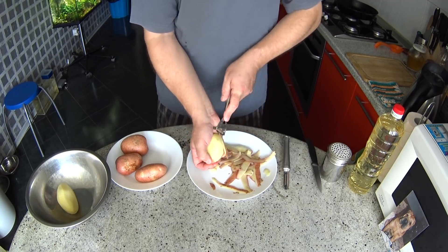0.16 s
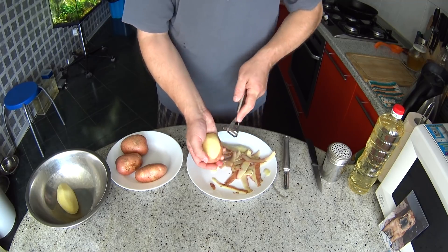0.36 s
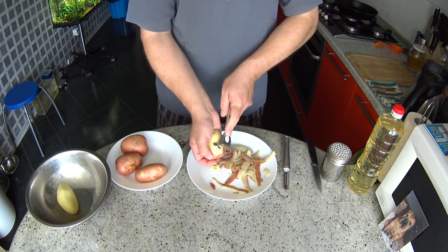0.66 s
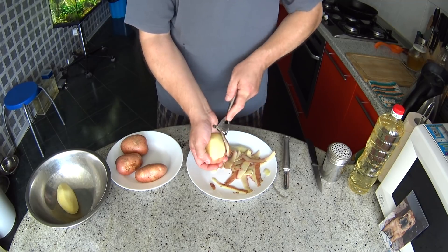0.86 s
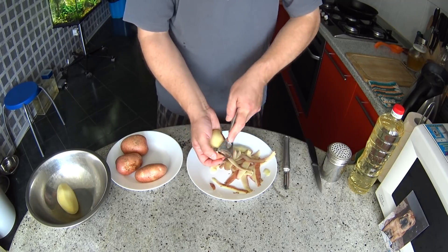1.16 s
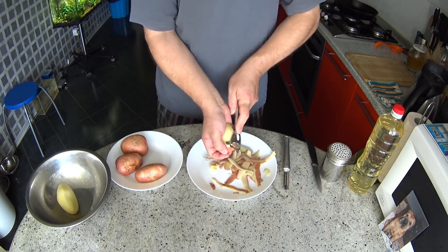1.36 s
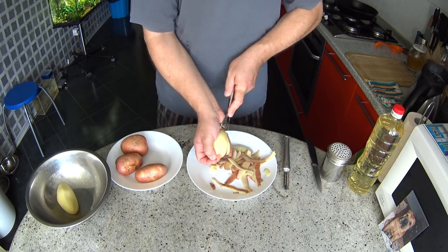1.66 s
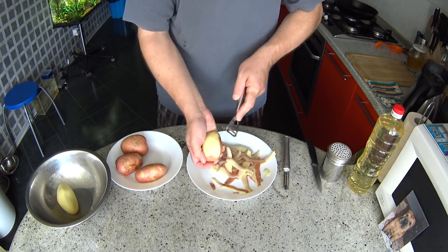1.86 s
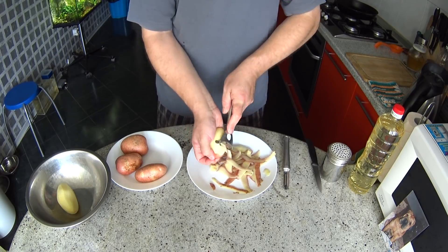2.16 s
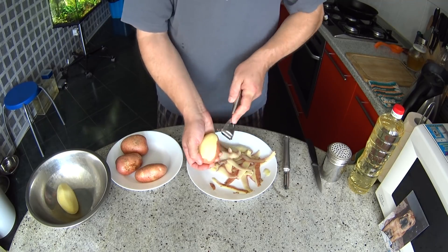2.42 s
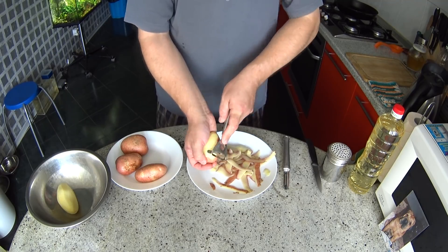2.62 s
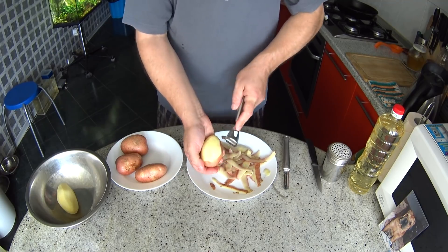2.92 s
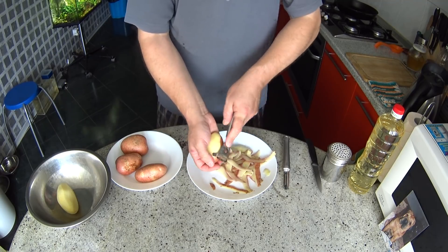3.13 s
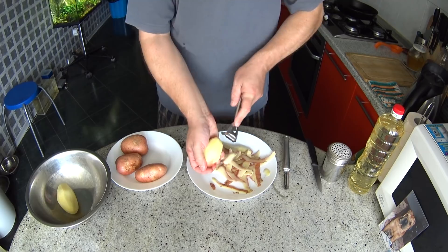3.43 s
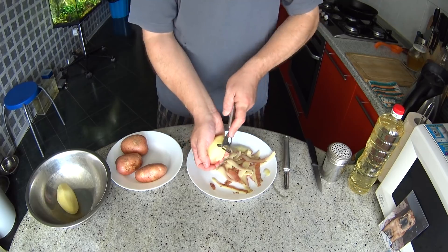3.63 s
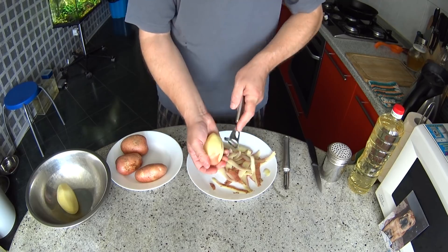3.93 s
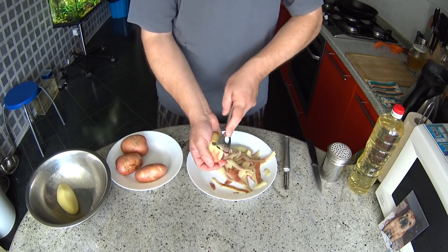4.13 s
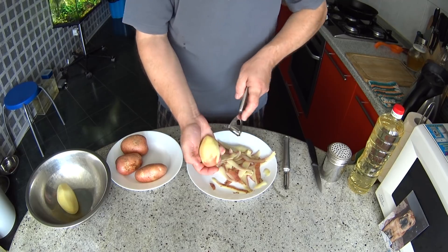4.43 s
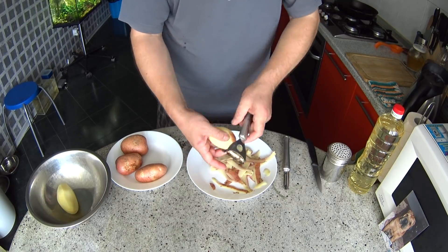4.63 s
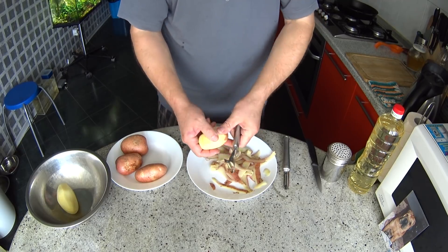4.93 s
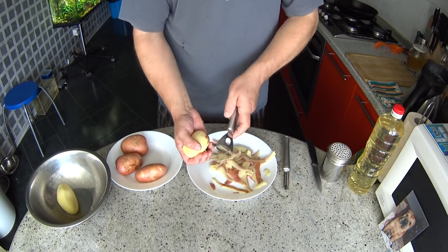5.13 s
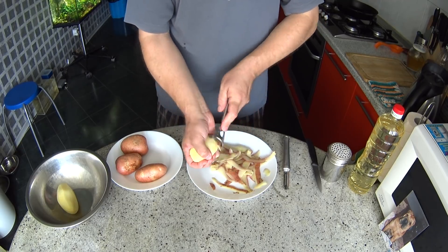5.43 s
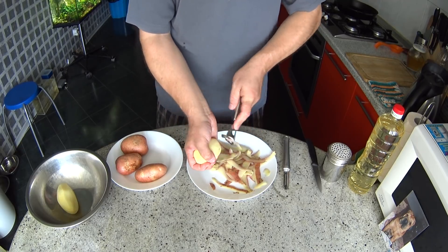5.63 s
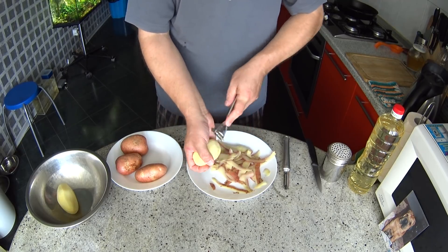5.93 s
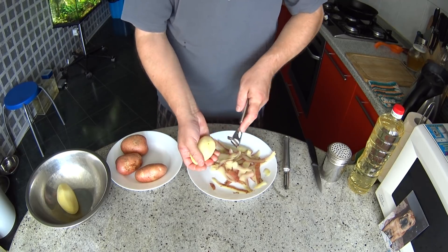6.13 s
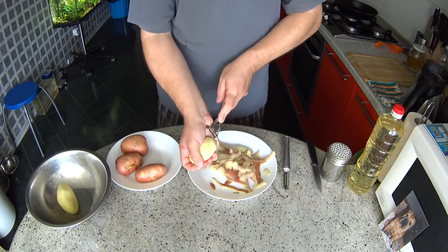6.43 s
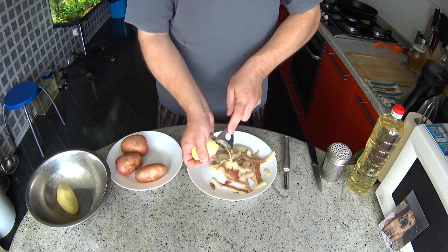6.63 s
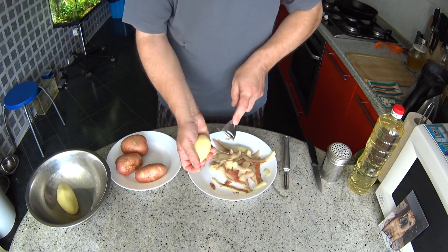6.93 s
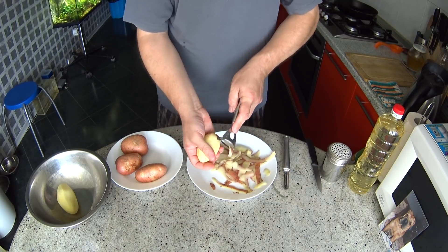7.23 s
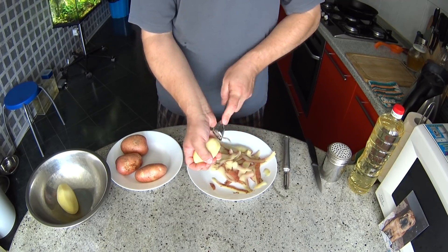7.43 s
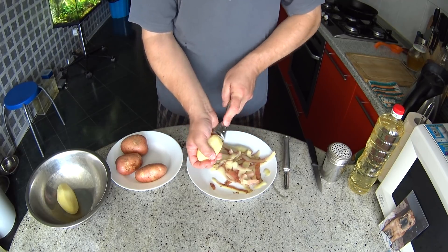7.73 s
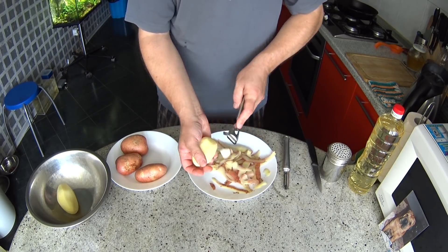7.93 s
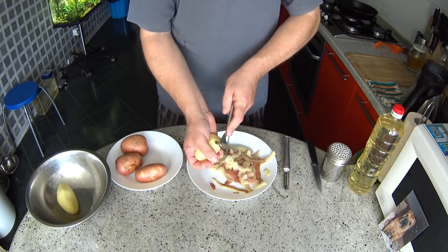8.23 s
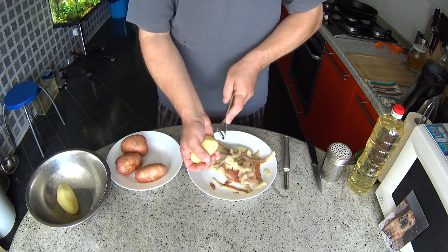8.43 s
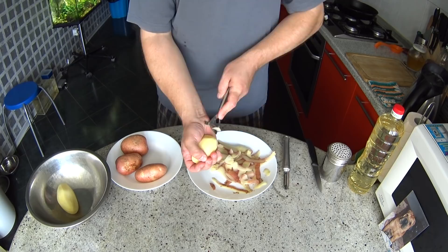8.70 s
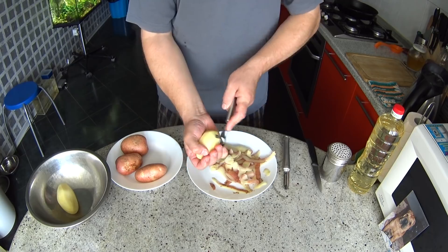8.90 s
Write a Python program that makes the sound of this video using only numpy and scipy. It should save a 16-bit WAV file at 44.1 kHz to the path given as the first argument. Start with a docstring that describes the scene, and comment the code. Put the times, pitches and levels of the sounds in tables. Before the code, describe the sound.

Close by, a loose-bladed metal peeler works on a raw potato, about two strokes a second. Each stroke lands with a sharp little clack, swells into a bright wet hiss with a faint metallic singing, then stops abruptly. Near the middle the rhythm pauses for a quick rattling shake, then peeling resumes. A refrigerator drones and buzzes softly behind. Stereo pickup in a reverberant, hard-walled kitchen.

```python
"""A metal peeler with a loose swivel blade rasps over a raw potato in a hard-walled kitchen.
Each stroke is shaped noise: a skid, then a swelling cut that hisses through the blade modes and makes the frame sing.
The blade clacks in its pivots as it lands, lifts and is shaken clean: short noise bursts through the same modes.
Behind it a refrigerator drones, buzzes on mains multiples and whines; one soft low bump is heard.
"""
import sys
import numpy as np
from scipy import signal
from scipy.fft import rfft, irfft, next_fast_len
from scipy.io import wavfile
from scipy.ndimage import uniform_filter1d

SR = 44100
rng = np.random.default_rng(int(sys.argv[2]) if len(sys.argv) > 2 else 0)


def store_wav(level_fs):
    """Save 16-bit WAV to argv[1]."""
    pcm = np.round(np.clip(np.atleast_2d(level_fs), -1, 1) * 32767)
    wavfile.write(sys.argv[1], SR, pcm.T.astype(np.int16))


N = 399590


def gain_of(db):
    """Decibels to amplitude."""
    return 10 ** (np.asarray(db) / 20)


def evened(x):
    """Scales to an rms of 1."""
    return x / np.sqrt(np.mean(x ** 2) + 1e-20)


def response_rms(h):
    """Rms gain of a response on white noise."""
    return np.sqrt(np.mean(abs(h) ** 2))


def read(points, hz):
    """Reads a table on a log-frequency axis."""
    f, value = np.transpose(points)
    return np.interp(np.log(hz + 1), np.log(f + 1), value)


def add(mix, start_s, sound):
    """Mixes a sound in at start_s."""
    part = mix[round(start_s * SR):][:len(sound)]
    part += sound[:len(part)]


def mode(hz, centre_hz, width_hz):
    """Response of one damped mode, 1 at its peak."""
    damping = 1j * hz * width_hz
    return damping / (centre_hz ** 2 - hz ** 2 + damping)


def wander(size, span_s):
    """Smoothed noise of rms 1, varying along the last axis."""
    span = max(round(span_s * SR), 2)
    once = uniform_filter1d(rng.standard_normal(size), span)
    return evened(uniform_filter1d(once, span))


# left-right likeness of diffuse sound: (frequency [Hz], correlation [-])
LIKENESS = [(60, 0.91), (180, 0.97), (550, 0.99), (1650, 0.51), (4970, 0.78), (15000, 1)]


def pair(z, other, hz):
    """Left and right spectra of diffuse sound at two close points, from independent mid and side."""
    same = np.clip(read(LIKENESS, hz), 0, 1)[:, None]
    mid = np.sqrt((1 + same) / 2) * z
    side = np.sqrt((1 - same) / 2) * other
    return np.array([mid + side, mid - side])


def diffuse_noise(frames, hz):
    """Random left and right spectra of a diffuse field."""
    a, b, c, d = rng.standard_normal((frames, len(hz), 4)).T
    return pair(a + 1j * b, c + 1j * d, hz)


# drone spectrum, relative: (frequency [Hz], density [dB per Hz])
DRONE_SPECTRUM = [(15, -67), (25, -35.5), (181, -14.5), (450, 1), (515, 0.5), (709, -0.5), (978, -5.5),
                  (1180, -4.5), (1670, -4.5), (5570, -23), (7090, -21), (9270, -33.5), (15000, -31)]
# hollow cabinet resonances over the drone: (frequency [Hz], width [Hz], added gain [dB])
CABINET_MODES = [(99.2, 9, 14), (158, 5.8, 14.5), (222, 18, 6), (297.6, 24.7, 7.5), (361, 57, 4.5),
                 (621.4, 3.9, 7.5), (670.5, 3, 10.5)]
# buzz harmonics: (multiple of the mains [-])
BUZZ_MULTIPLES = [9, 21, 22, 23, 24, 25, 27, 28, 29, 30, 31, 35, 36, 37]
# rms of each harmonic before its slow swell: (level [dB])
BUZZ_LEVELS_DB = [-57.5, -67.5, -66.5, -59, -58.5, -64.5, -64, -63.5, -61.5, -67, -60, -77, -76, -65.5]
DRONE_DB, MAINS_HZ = -47.5, 50
WHINE_HZ, WHINE_DB = 714, -57.5  # a lone motor tone


def refrigerator():
    """Steady broad drone with cabinet resonances, a mains-locked buzz and a whine."""
    hz = np.fft.rfftfreq(8192, 1 / SR)
    hollow = 1 + sum(gain_of(db) * abs(mode(hz, f, w)) ** 2 for f, w, db in CABINET_MODES)
    colour = gain_of(read(DRONE_SPECTRUM, hz)) * hollow
    z = diffuse_noise(N // 2048 + 6, hz) * colour[:, None]
    drone = signal.istft(z, nperseg=8192, noverlap=6144)[1][:, :N]
    out = gain_of(DRONE_DB) * evened(drone)
    t = np.arange(N) / SR
    buzz = [(k * MAINS_HZ, db) for k, db in zip(BUZZ_MULTIPLES, BUZZ_LEVELS_DB)]
    for f, db in [(WHINE_HZ, WHINE_DB)] + buzz:
        phase = 2 * np.pi * rng.random()
        lag_rad = 0.17 * rng.choice([-1, 1])  # opposite in the two channels
        drift, swell_db = wander((2, N), 0.13)
        turn = 2 * np.pi * f * t + phase + drift / 4
        out += np.sqrt(2) * gain_of(db + swell_db) * np.sin(turn + np.array([[lag_rad], [-lag_rad]]))
    return out


BUMP_S, BUMP_DB, BUMP_PEAK_AFTER_S, BUMP_TOP_HZ = 6.89, -49.5, .04, 700


def bump():
    """A soft puff of low noise."""
    u = np.arange(SR // 2) / SR / BUMP_PEAK_AFTER_S
    band = signal.butter(2, [100, BUMP_TOP_HZ], "band", fs=SR, output="sos")
    noise = evened(signal.sosfilt(band, rng.standard_normal(len(u))))
    out = np.zeros(N)
    add(out, BUMP_S, gain_of(BUMP_DB) * noise * u * np.exp(1 - u))
    return out


# reverberation time: (frequency [Hz], t60 [s])
KITCHEN_T60 = [(1500, 1), (4000, 0.58), (8000, 0.45), (14000, 0.24)]


def kitchen(x):
    """Diffuse room tail that fades in within a millisecond, each band dying at its own speed."""
    frames, hz = 260, np.fft.rfftfreq(256, 1 / SR)
    t = np.arange(frames) * 128 / SR
    z = diffuse_noise(frames, hz) * gain_of(-60 * t / read(KITCHEN_T60, hz)[:, None])
    tail = signal.istft(z, nperseg=256)[1]
    tail = tail * np.clip(np.arange(tail.shape[1]) / SR / 0.00067, 0, 1)  # 0.67 ms fade-in
    return signal.fftconvolve(x[None], tail / np.linalg.norm(tail[0]), axes=1)[:, :N]


# modes of blade and frame, before random shares: (frequency [Hz], width [Hz], gain [dB])
PEELER_MODES = [(2260, 480, -5), (3947, 50, 5), (4700, 900, -9.5), (5890, 200, -3.5), (6365, 200, -2.5),
                (6953, 125, 4.5), (7335, 130, 3.5), (7870, 130, -4.5), (8300, 290, -5.5), (9680, 570, -11),
                (10800, 170, -9.5), (13040, 480, -5.5), (14540, 420, -15.5)]


def rings(hz, spread_db):
    """Summed response of the modes, in random shares that stand for where the contact falls."""
    shares_db = spread_db * rng.standard_normal(len(PEELER_MODES))
    return sum(gain_of(db + share) * mode(hz, f, w)
               for (f, w, db), share in zip(PEELER_MODES, shares_db))


CLACK_HIGH_DB = -2.5  # high modes against the middle ones


def clack(peak_db, rattle_s, low_db, handle_hz):
    """A few ms of uneven pivot rattle: the bare contact, the ringing steel and a handle mode set by the grip."""
    t, hz = np.arange(4096) / SR, np.fft.rfftfreq(4096, 1 / SR)
    u = t / np.clip(rattle_s, 1 / 2000, 1 / 50)
    envelope = u ** 1.28 * np.exp(-u)
    rattle = rng.standard_normal(len(t)) * envelope * gain_of(5.5 * wander(len(t), 0.0029))
    # harder knocks also thud on the potato: the contact reaches lower
    corner_hz = np.clip(1700 * gain_of(-.5 * (peak_db + 41)), 800, 3000)
    contact = gain_of(-8) * hz ** 2 / (hz ** 2 + corner_hz ** 2)
    handle = gain_of(8.0) * mode(hz, handle_hz, 300)
    z = rfft(rattle) * (rings(hz, spread_db=1.0) + contact + handle)
    low = np.clip((6200 - hz) / 1000, 0, 1)
    high = np.clip((hz - 8300) / 1000, 0, 1)
    out = 0
    for share, db in (low, low_db), (1 - low - high, 0), (high, CLACK_HIGH_DB):
        band = irfft(z * share)
        peak_rms = np.sqrt(uniform_filter1d(band ** 2, size=130).max())  # 3 ms window
        out = out + gain_of(db) * band / peak_rms
    return gain_of(peak_db) * out


# blade knocking in its pivots; level is the short-term rms peak of the middle band, each knock starts 1 ms early:
# (time [s], level [dB], rattle decay [s], low modes against middle [dB], handle mode [Hz])
PIVOT_KNOCKS = [(0.288, -44, 0.0045, -5, 4330), (0.301, -33, 0.0036, -4, 4220),
                (0.583, -32, 0.0023, -6.5, 4330), (0.915, -33, 0.0025, -5.5, 4300),
                (0.929, -40, 0.0012, -7, 4400), (1.064, -52.5, 0.001, -10, 4400),
                (1.194, -35.5, 0.0021, -2, 3670), (1.793, -33.5, 0.007, -7, 4030),
                (2.047, -36, 0.0012, -3.5, 4400), (2.296, -36.5, 0.0011, -6, 3700),
                (2.385, -38.5, 0.0057, -7, 4400), (2.404, -30.5, 0.0021, -2.5, 4240),
                (2.631, -33.5, 0.0018, -7, 4360), (2.766, -35.5, 0.0013, -14, 3780),
                (2.84, -32, 0.0026, -8.5, 4320), (2.868, -35.5, 0.0031, -6.5, 4300),
                (2.912, -41, 0.0018, -4.5, 4500), (3.158, -29, 0.0025, -6.5, 4670),
                (3.333, -36.5, 0.0015, -3, 3760), (3.397, -41, 0.0044, -6, 4530),
                (3.427, -37.5, 0.0046, -11, 4750), (3.661, -28.5, 0.0018, -11, 5100),
                (3.819, -36.5, 0.0054, -0.5, 4200), (3.924, -41, 0.0027, -7, 4260),
                (4.135, -31.5, 0.0017, -1.2, 4230), (4.325, -40, 0.0024, -4, 4260),
                (4.346, -30, 0.0027, -6.5, 4180), (4.743, -39, 0.0064, -10, 4570),
                (4.8004, -33, 0.0042, -7.5, 4560), (4.889, -42, 0.0028, -5, 4500),
                (4.978, -52, 0.0028, -6, 4600), (5.311, -50, 0.0044, -3, 4120),
                (5.3585, -42, 0.003, -2.5, 3800), (5.499, -31.5, 0.00098, -2.5, 5200),
                (5.595, -44, 0.007, -3.5, 4370), (5.629, -48, 0.0036, -8, 4400),
                (5.779, -27.5, 0.0038, -3, 3830), (5.824, -41, 0.0035, -1, 3820),
                (5.963, -39.5, 0.0069, -5, 4330), (6.343, -35, 0.0037, -2, 4550),
                (6.45, -41, 0.00092, -1, 4400), (6.533, -42.5, 0.006, -4.5, 4160),
                (6.727, -30.5, 0.0032, -7.5, 4840), (6.855, -33, 0.0042, -8, 4190),
                (7.354, -25, 0.0023, -6.5, 3800), (7.447, -35.5, 0.0021, 0.5, 4800),
                (7.533, -39.5, 0.0035, -7.5, 4180), (7.7, -30, 0.0025, -6.5, 3770),
                (7.858, -35.5, 0.0013, -6.5, 4930), (8.254, -36, 0.0016, -10, 3850),
                (8.307, -43.5, 0.002, -1, 5240), (8.366, -32, 0.0024, -4, 4080),
                (8.435, -36.5, 0.0062, -2, 4200), (8.515, -49.5, 0.0015, -4, 5300),
                (8.606, -34.5, 0.00088, -1, 3680), (8.705, -44, 0.002, 0, 5900),
                (8.778, -31, 0.0047, -5, 4100), (8.892, -47, 0.004, -5, 4160),
                (8.934, -40, 0.0016, -4, 4020), (8.947, -29, 0.002, -1, 3730),
                (9.042, -39.5, 0.0017, 3, 5940)]


def pivot_clacks():
    """Places every knock of the loose blade in its pivots."""
    out = np.zeros(N)
    for time_s, *row in PIVOT_KNOCKS:
        add(out, time_s - .001, clack(*row))
    return out


def clumped(x, depth_db):
    """Patches of about 1 kHz by 15 ms stand out or sink, as the flesh tears unevenly."""
    z = signal.stft(x, nperseg=256, noverlap=192)[2]
    across_hz = uniform_filter1d(rng.standard_normal(z.shape), size=6, axis=0)
    patches = evened(uniform_filter1d(across_hz, size=10))
    return signal.istft(z * gain_of(depth_db * patches), nperseg=256, noverlap=192)[1]


SKID_DB_PER_S, RELEASE_DB_PER_S, SWELL_SHAPE = 220, 456, 1.07


def pressure(t, skid_db, rise_s, swell_db, top_db, hold_s):
    """Cutting level in dB: a skid that dies after landing, then the cut swells, holds and lets go."""
    swell = swell_db * np.clip(1 - t / rise_s, 0, 1) ** SWELL_SHAPE
    release = RELEASE_DB_PER_S * np.maximum(t - rise_s - hold_s, 0)
    cut = top_db - swell - release
    skid = skid_db - SKID_DB_PER_S * t - release
    return 10 * np.log10(10 ** (cut / 10) + 10 ** (skid / 10))


# hiss of the tearing flesh, relative: (frequency [Hz], density [dB per Hz])
CUT_SPECTRUM = [(880, -13), (1500, 0.5), (1700, -12), (2550, -1.5), (2810, 0), (7720, -4), (9540, -7),
                (15000, -5.5)]
# singing frame modes, one list before and one after the grip changes, each response squared:
# (frequency [Hz], width before squaring [Hz], gain [dB])
SINGING_MODES = [
    [(2510, 130, -4), (2394, 320, -9.5)],
    [(3880, 340, -1), (2270, 310, -7)],
]
# how far singing follows the cutting level, before and after the grip changes: (share [-])
SINGING_FOLLOW = [0.28, 0.62]
REGRIP_S, STROKE_S = 4.5, .36
SING_ONSET_S, SING_PATCHY_DB = 0.023, 3.5


def stroke(start_s, skid_db, rise_s, swell_db, top_db, hold_s, sing_db):
    """Tearing cells hiss densely with a slight judder; the hiss also rings blade and frame."""
    t, grip = np.arange(0, STROKE_S, 1 / SR), int(start_s > REGRIP_S)
    level_db = pressure(t, skid_db, rise_s, swell_db, top_db, hold_s)
    size = next_fast_len(len(t) + 3000)  # room for the ringing
    hz = np.fft.rfftfreq(size, 1 / SR)
    judder_db = 2 * wander(len(t), .0015) + wander(len(t), .01)
    effort = gain_of(level_db + judder_db) * np.minimum(t / 0.014, 1)

    def driven(drive, h):
        """Noise of the stroke's effort through one response."""
        noise = rng.standard_normal(len(t)) * effort * drive
        return irfft(rfft(noise, size) * h / response_rms(h), size)

    # the contact slides along the blade, so three sets of mode shares fade into one another
    slide = np.pi * (t / .12 + rng.random())
    hiss = 0
    for k in range(3):
        colour = gain_of(read(CUT_SPECTRUM, hz)) * (1 + gain_of(-4.0) * rings(hz, spread_db=10.5))
        hiss = hiss + driven(np.cos(slide + k * np.pi / 3), colour)
    # the frame takes a moment to start singing and then comes and goes
    frame = sum(gain_of(db) * mode(hz, f, w) ** 2 for f, w, db in SINGING_MODES[grip])
    song_db = sing_db + SINGING_FOLLOW[grip] * (level_db - top_db) + SING_PATCHY_DB * wander(len(t), 0.017)
    onset = np.minimum(t / SING_ONSET_S, 1) ** 2
    song = driven(gain_of(song_db - level_db) * onset, frame)
    return clumped(hiss, depth_db=2.5)[:size] + song


# one row a stroke or brush; hiss levels are per layer, the three layers together lie 1.8 dB higher:
# (landing time [s], skid level [dB], rise [s], swell [dB], top level [dB], hold [s], frame singing level [dB])
STROKES_AND_BRUSHES = [(0.0, -51.5, 0.11, 22, -43, 0.067, -52.5), (0.601, -54, 0.17, 15, -43, .004, -49),
                       (1.207, -51, .01, 3, -56, .01, -57), (1.567, -66, 0.065, 14, -42.5, 0.043, -50.5),
                       (2.059, -51, 0.2, 23, -42, 0.029, -49), (2.644, -58, 0.082, 10, -42.5, 0.036, -47),
                       (3.167, -43, .09, 16, -44, 0.058, -48.5),
                       (3.671, -44.5, 0.041, 14, -41.5, 0.017, -47.5),
                       (4.148, -51, 0.082, 6, -43, .004, -50.5), (4.716, -62, 0.039, 5, -54.5, .006, -63),
                       (4.791, -66, .016, 9, -57, 0.011, -70), (4.84, -64, 0.031, 2, -56.5, .015, -73),
                       (5.368, -68, 0.1, 18, -43.5, 0.019, -46.5), (5.8, -48, 0.041, 25, -40, .012, -50.5),
                       (6.358, -60, 0.079, 15, -41.5, .004, -47.5),
                       (6.746, -42.5, 0.07, 20, -43, 0.028, -65), (7.368, -52, .02, 3, -46.5, 0.071, -57),
                       (7.709, -58, 0.054, 15, -40.5, .004, -45.5), (8.262, -64, 0.1, 25, -45, .004, -49),
                       (8.62, -66, 0.063, 21, -47.5, .008, -48.5), (8.96, -53, .03, 7, -49, .08, -52)]


def strokes_and_brushes():
    """Places every peeling stroke, and three faint brushes as the blade is shaken clean near 4.8 s."""
    out = np.zeros(N)
    for row in STROKES_AND_BRUSHES:
        add(out, row[0], stroke(*row))
    return out


def scene():
    """Peeler near the middle, its room tail, the refrigerator and the bump."""
    background = refrigerator() + bump()
    peeler = pivot_clacks() + strokes_and_brushes()
    direct = peeler * gain_of([[.2], [-.2]])  # left and right
    return direct + gain_of(-5.0) * kitchen(peeler) + background


EDGE_HZ = 14900


def record(dry):
    """Band limit: a steep low-pass at EDGE_HZ."""
    low_pass = signal.firwin(401, EDGE_HZ, window=("kaiser", 7), fs=SR)
    return signal.oaconvolve(dry, low_pass[None], "same")


dry = scene()
out = record(dry)
store_wav(out)
```